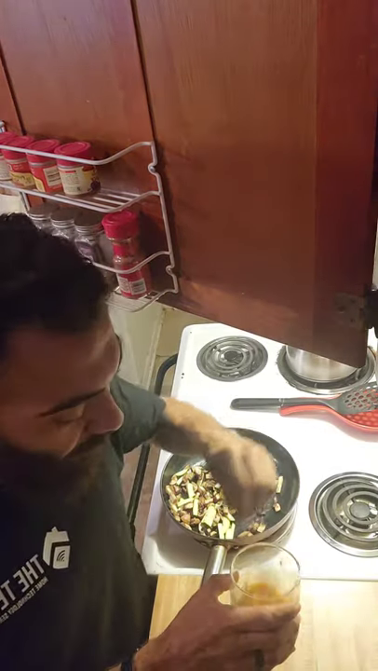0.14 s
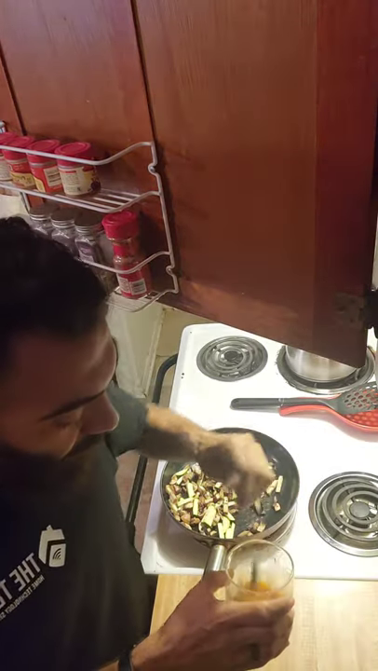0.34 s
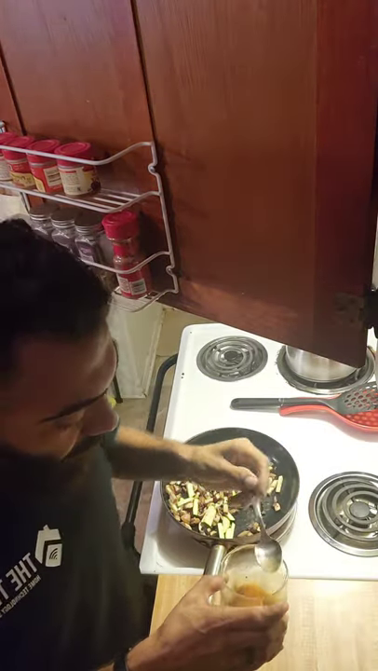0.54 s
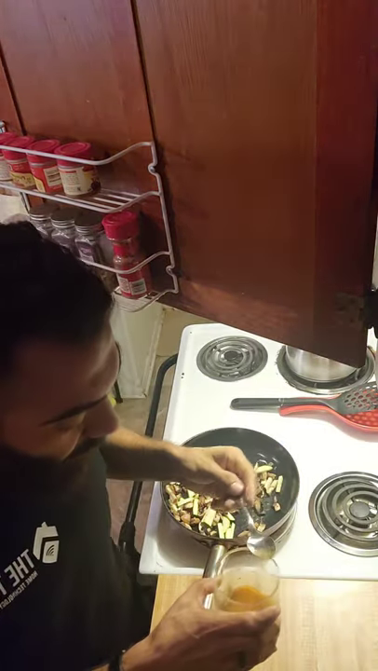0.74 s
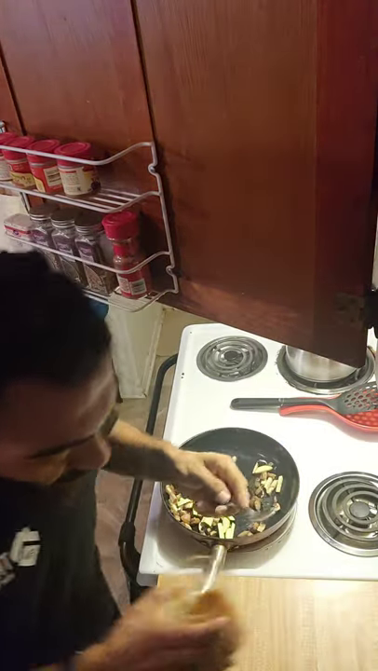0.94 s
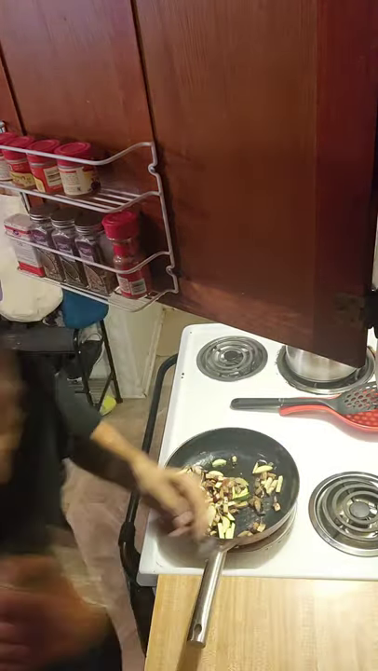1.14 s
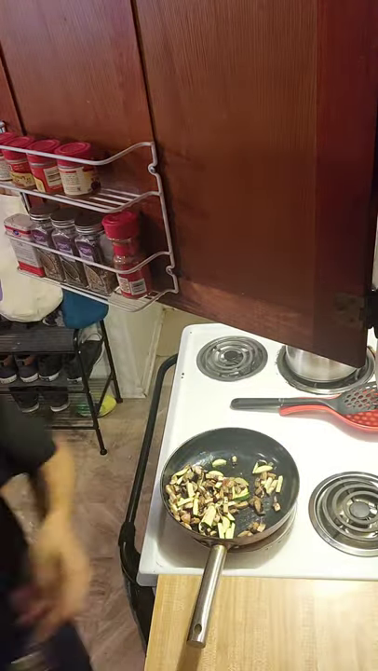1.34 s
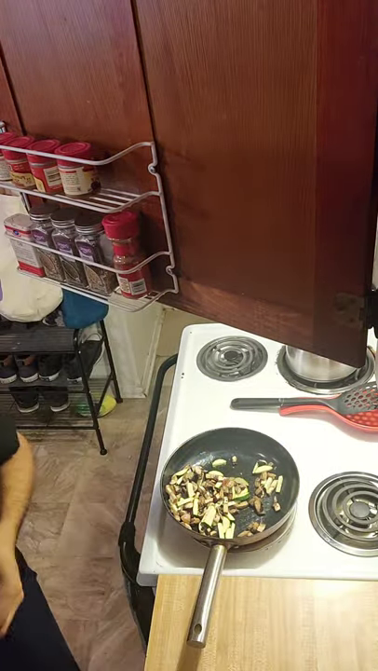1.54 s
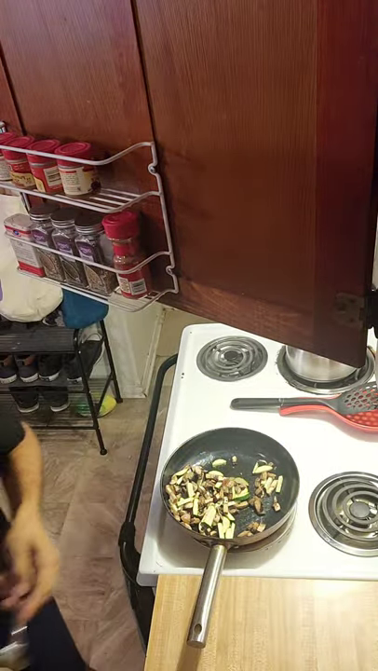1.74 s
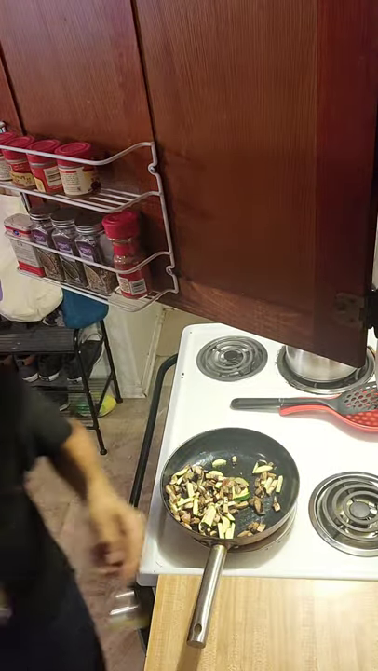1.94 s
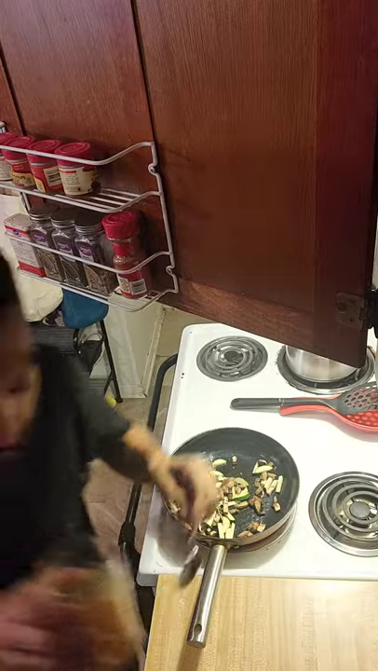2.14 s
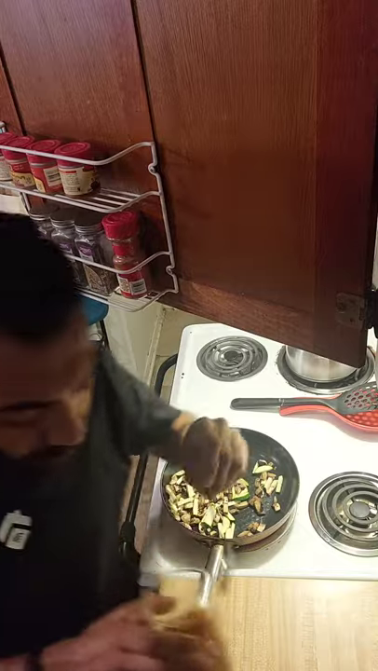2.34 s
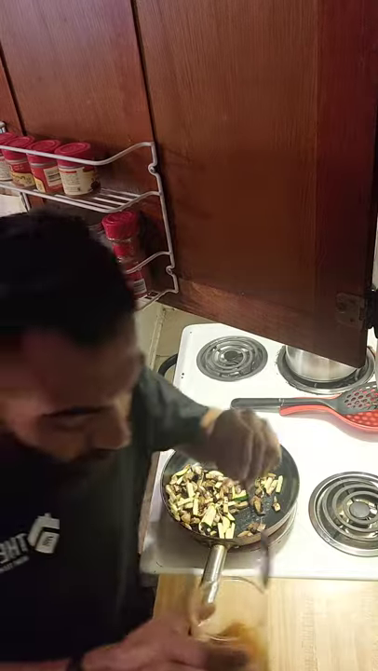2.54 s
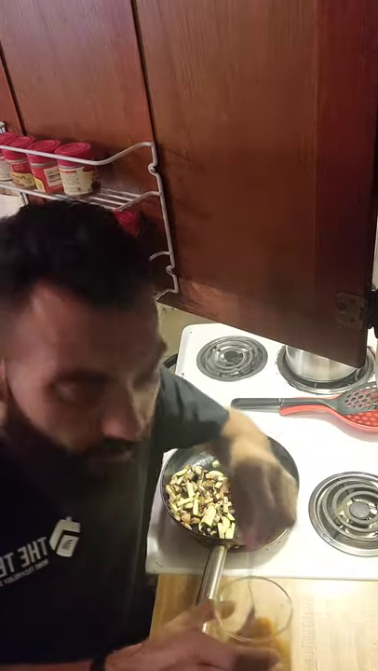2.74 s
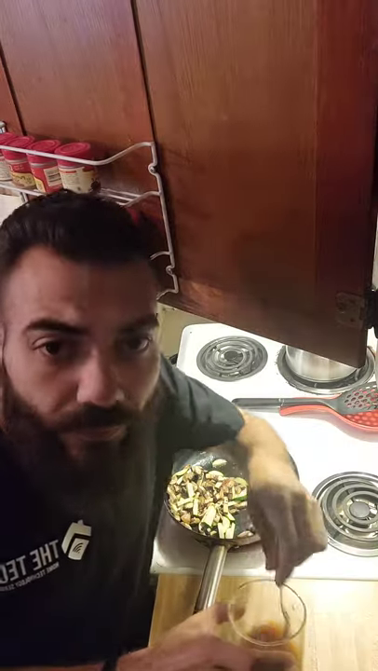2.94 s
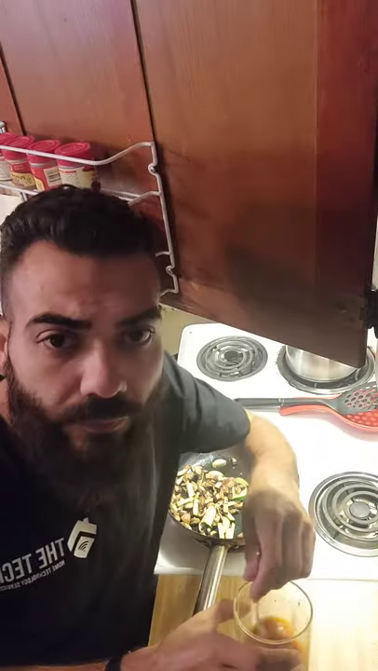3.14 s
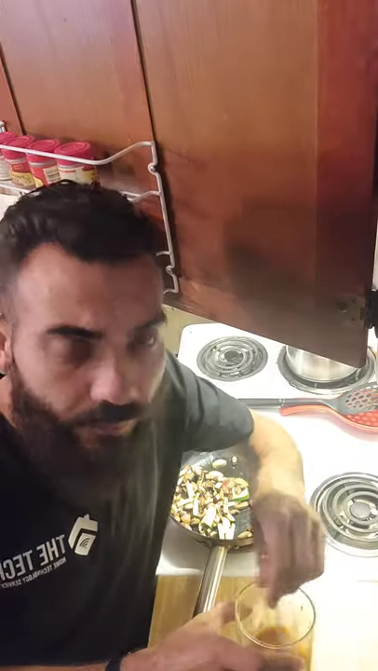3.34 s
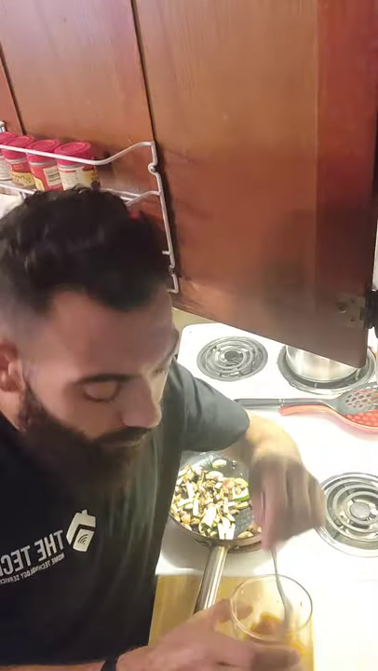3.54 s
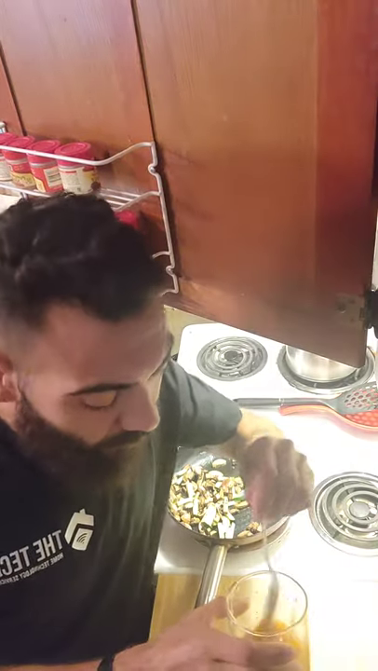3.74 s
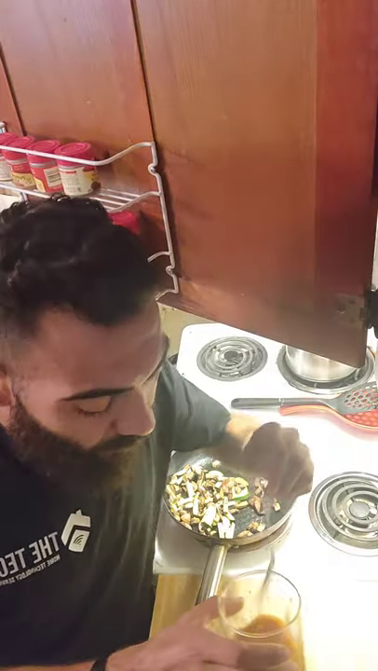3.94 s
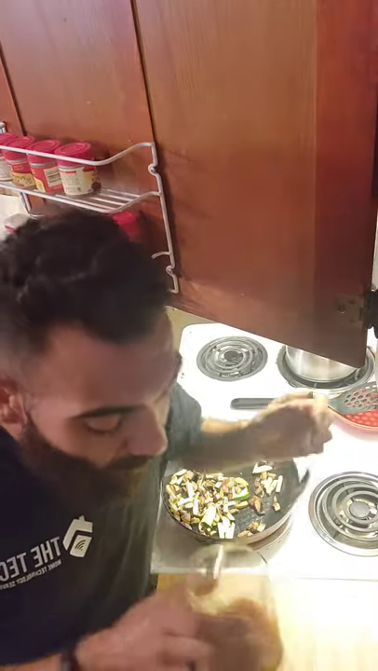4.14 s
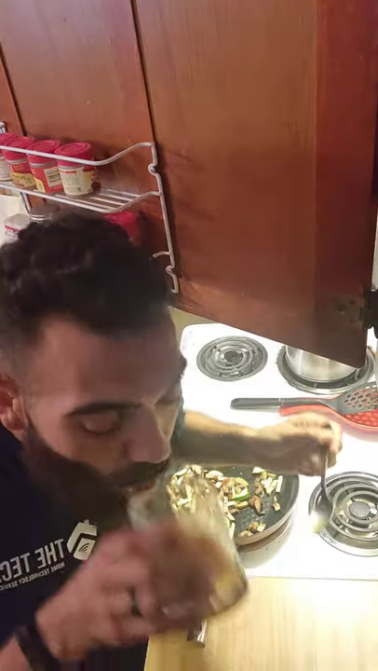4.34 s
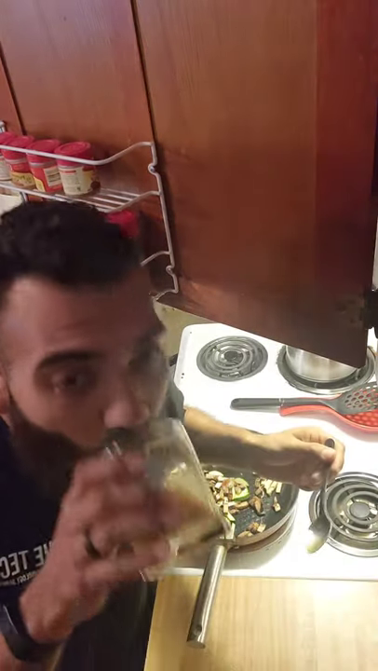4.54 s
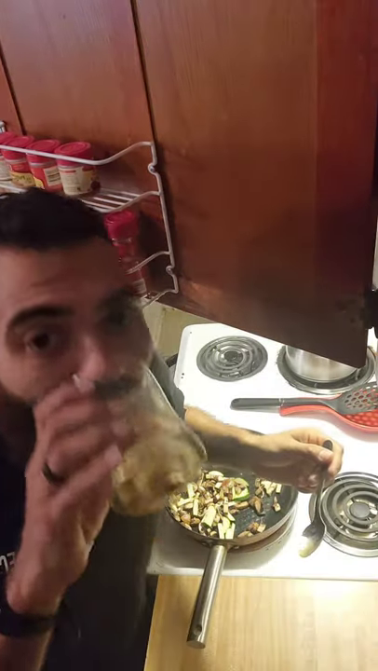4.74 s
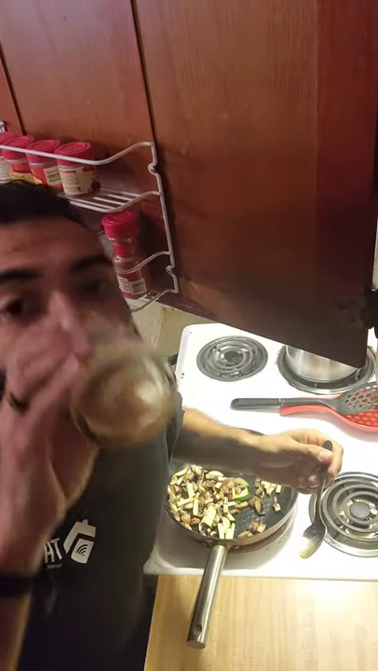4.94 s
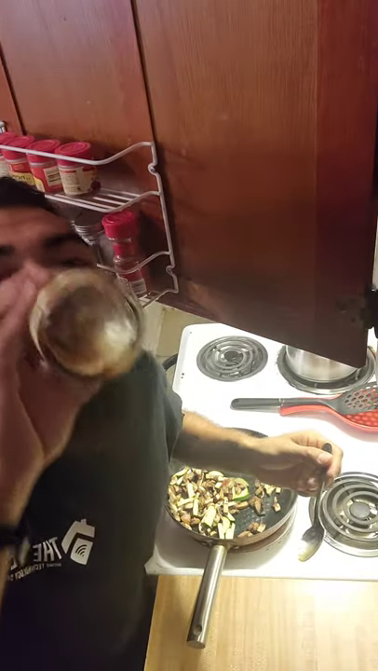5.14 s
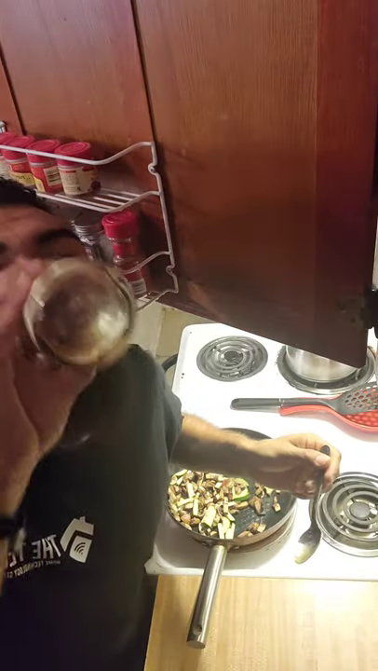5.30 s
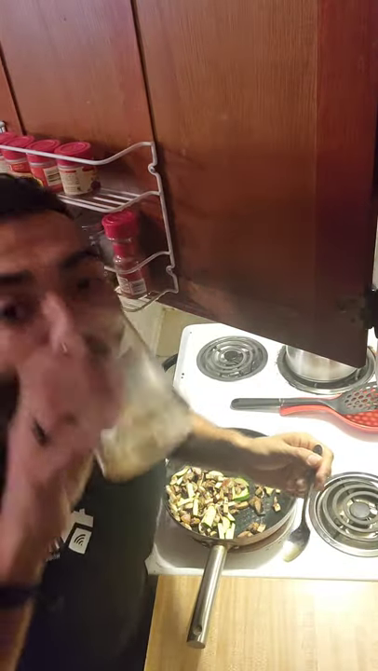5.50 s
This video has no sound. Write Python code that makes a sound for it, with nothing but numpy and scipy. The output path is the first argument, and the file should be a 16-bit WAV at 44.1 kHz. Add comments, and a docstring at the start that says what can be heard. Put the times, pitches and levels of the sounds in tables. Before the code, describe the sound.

Vegetables sizzle steadily in a frying pan while a metal spoon clinks in a hand-held glass, in bursts, over a low appliance rumble.

```python
"""Frying and stirring in a small kitchen

Stove to the right of a phone with two microphone ports: vegetables fry as dense noise clicks in flickering bands,
narrow noises make the pan hum, and larger oil bubbles spit as short damped tones.
A steel spoon taps and stirs in a hand-held glass: noise cracks with fading sines, echoed by the kitchen.
An appliance rumbles in the background: shaped noise, a swelling motor drone and a mains hum."""
import sys
import numpy as np
from scipy import signal
from scipy.fft import rfft, irfft, next_fast_len
from scipy.io import wavfile
from scipy.ndimage import uniform_filter1d

SR = 44100
rng = np.random.default_rng(int(sys.argv[2]) if len(sys.argv) > 2 else 0)


def store_pcm(level_fs):
    """Save levels as 16-bit WAV."""
    pcm = np.round(np.clip(level_fs, -1, 1) * 32767).astype(np.int16)
    wavfile.write(sys.argv[1], SR, np.atleast_2d(pcm).T)


N = 250047

# how hard the food fries, before the split between the ports: [t/s, level/dB]
FRY_LEVEL = [(0.0, -43), (0.33, -40), (0.75, -42.5), (1.36, -40), (2.3, -40), (2.46, -43), (2.75, -42.5),
             (3.13, -40.5), (3.45, -42), (3.9, -41.5), (4.55, -39), (5.2, -40.5), (5.67, -39.5)]
# colour of the frying ahead of the tilt, relative: [f/Hz, level per Hz/dB]
FRY_COLOUR = [(650, -55), (1100, -14), (1300, -14), (1510, -19.5), (1930, -8), (2460, -11.5), (4300, -4),
              (4770, -1.5), (5200, -4), (6000, 0), (7140, -12), (8360, -18), (9240, -16), (11300, -6.5),
              (12500, -8.5), (15800, -18)]
# three groups of pan modes, each mode relative to its group: [f/Hz, width/Hz, level/dB]
PAN_MODES = [
    [(717.7, 7.4, 6), (626.6, 12, -0.5), (770, 16, -8)],
    [(970, 10.5, 7.5), (1310, 140, 9)],
    [(539.5, 27.5, 5), (506, 10, -5)],
]
# drive of each group: [rms level at the start for usual frying/dB, gain per dB of frying/dB, growth/(dB/s)]
PAN_DRIVE = [(-74, 2.5, 1.5), (-72.5, 1.4, 0.5), (-66, 0.1, 0.22)]
# room tone, relative: [f/Hz, level per Hz/dB]
ROOM_TONE_COLOUR = [(12, -62), (20, -22), (42, -12), (65, -1), (123, -14), (142, -6.5), (250, -9),
                    (382, -9.5), (528, -11.5), (659, -11), (700, -3), (823, -8.5), (987, -17.5),
                    (1050, -17.5), (2500, -11), (3250, -35), (5500, -120)]
# likeness of the room tone at the two ports: [f/Hz, left-right correlation]
PORT_LIKENESS = [(60, 1), (130, 0.83), (290, 0.88), (640, 0.21), (1400, 0.79)]
# motor drone resonances, relative: [f/Hz, width/Hz, level/dB]
DRONE_MODES = [(60.4, 13, -2.5), (77.5, 13.5, 0)]
# rough level of the motor drone, which wavers by chance, ahead of its swell: [t/s, level/dB]
DRONE_ROUGH_LEVEL = [(0.0, -60.5), (2.5, -61.5), (3.4, -63.5), (3.7, -60.5), (4.7, -64), (5.67, -57.5)]
# spoon blows, and at 2.276 s a soft swell of noise and ringing just before the blow at 2.293 s;
# levels ahead of the onset, the left-right split and the high-pass: [t/s, noise level/dB, rise/s,
# fade length factor, left minus right/dB, slope of the ring/(dB/octave), then level/dB of the spoon's ring,
# its treble shimmer, and the belly, rim, wall and gripped base of the glass]
BLOWS_AND_SWELL = [(0.047, -11, 0.0025, 0.61, -5.5, 1, -25.5, -27.5, -27, -36, -51, -42),
                   (0.217, -9.5, 0.0038, 0.8, -4, 0.1, -22.5, -25, -22, -35.5, -62, -45),
                   (0.441, -15.5, 0.0025, 0.67, -6, 10.5, -29.5, -32.5, -22.5, -27.5, -35, -37.5),
                   (2.276, -9.5, 0.0174, 0.25, 0.7, 8, -28, -33, -27.5, -30, -40, -38),
                   (2.293, -14, 0.0023, 1.22, -1, 2, -21, -23, -19, -43, -28.5, -57),
                   (2.311, -16, 0.0014, 0.39, -2, 1, -25, -46, -29, -43, -37, -53),
                   (2.322, -19, 0.0014, 0.74, -3, 6, -29, -30, -35, -45, -49, -55),
                   (2.344, -20, 0.0048, 0.76, -4, 7, -32, -40, -47, -57, -56, -57),
                   (2.452, -38, 0.0019, 1.16, -5, 3, -49, -45, -38.5, -62, -62, -60),
                   (2.924, -12, 0.0014, 0.68, -6, 1, -25, -48, -30.5, -20, -30, -42),
                   (2.943, -11.5, 0.00082, 0.95, -2.5, -14, -22, -38, -36, -21.5, -39, -68),
                   (3.051, -21, 0.0017, 0.89, -10, 5, -44, -41, -47, -56, -43, -36),
                   (3.056, -14.5, 0.0018, 0.89, -4.5, 4, -40, -34, -33.5, -48, -44, -34),
                   (3.158, -11, 0.0017, 0.71, -4.5, 6, -46, -22.5, -33.5, -38, -22, -54),
                   (3.325, -41, 0.0012, 1.4, -7, -4.5, -59, -56, -65, -62, -59, -55),
                   (3.369, -35.5, 0.0011, 0.59, -4.5, 0.5, -39, -37, -32.5, -38, -36.5, -32.5),
                   (3.376, -32, 0.001, 0.41, -3, 2, -42, -57, -37, -55, -46, -39)]
# glass and spoon modes in groups that sound together: [f/Hz, ...] for each group
RING_HZ = [
    [860, 1000],
    [1195],
    [1885, 1920, 2022],
    [2230, 2279],
    [2357, 2760, 3560, 3960, 8780],
    [3010, 3070, 3240],
    [4130, 4380, 4650],
    [4870, 4918, 5040],
    [5540, 5755, 6020, 6290],
    [6780, 7335, 7650],
    [10800, 10995, 11150],
    [11850, 12400, 12850, 13750],
]
# the same modes, relative to their group: [level/dB, t60/s before the length factor]
RING_FADE = [
    [(0.15, 0.08), (-1.2, 0.072)],
    [(0, 0.58)],
    [(-3, 0.078), (-6, 0.16), (0.5, 0.079)],
    [(-0.5, 0.14), (1, 0.17)],
    [(-2.5, 0.11), (-4.5, 0.076), (-0.5, 0.062), (-4, 0.089), (-7, 0.12)],
    [(-6.5, 0.32), (-1.5, 0.17), (-5, 0.1)],
    [(0.5, 0.13), (3, 0.024), (-5, 0.08)],
    [(-6, 0.075), (7, 0.084), (3.5, 0.084)],
    [(7, 0.025), (0.66, 0.025), (4.5, 0.014), (2, 0.16)],
    [(-2.5, 0.019), (-9, 0.068), (-9.5, 0.2)],
    [(-0.5, 0.09), (-10, 0.06), (-2, 0.055)],
    [(-18, 0.035), (-16, .04), (7, 0.061), (-14, .04)],
]
# the part of spoon or glass that each group belongs to: [name]
RING_PART = ["base", "belly", "belly", "rim", "wall", "spoon", "base", "spoon", "shimmer", "shimmer",
             "shimmer", "wall"]
# each group against its part: [level/dB]
RING_GROUP_DB = [-1, -35, 0.5, -0.5, 0, 0, 2, -0.4, -2.5, -2, -1.5, -10]
# loud spits of oil, ahead of onset and decay: [t/s, level/dB, f/Hz]
SPITS = [(1.404, -24, 5800), (1.863, -20, 6000), (3.457, -34, 5530), (5.437, -14, 13200),
         (5.472, -20, 11200), (5.484, -30, 13500)]
# the far (left) port of the phone, shadowed from the stove: [f/Hz, level/dB, phase lag/rad]
FAR_PORT = [(300, 0.5, .1), (663, -3, 1.33), (1370, -1, 1.5), (2400, 1.5, 0.27), (3240, 1, 2),
            (4730, -1.5, 2.3), (5730, -4.5, 1.57), (7100, 0.5, 2.15), (11000, -3, 2.1), (13300, -7, 5.4),
            (16000, 0, 3.5)]

FRY_USUAL_DB, FRY_DIFFUSE_DB = -41, 5
FRY_TILT_DB_PER_OCTAVE, FRY_LEFT_MINUS_RIGHT_DB = 0.97, -4  # the split comes on top of the far port's shadow
ROOM_TONE_DB, MAINS_DB, MAINS_HZ = -59, -67.5, 119.5
DRONE_SWELL_DB, DRONE_SWELLS_PER_S = 1.2, 5.28
CRACK_TILT_DB_PER_OCTAVE, CRACK_T60_S = 0.4, 0.08  # t60 before the length factor
KITCHEN_T60_S, KITCHEN_DB = 0.2, -6
TOP_HZ = 15750


def undb(db):
    """Decibels to gain."""
    return 10 ** (np.asarray(db) / 20)


def level(x, db):
    """Scale to an rms level."""
    return x * undb(db) / np.sqrt(np.mean(x ** 2))


def over_hz(table, column, size):
    """A table column at every bin of a spectrum, joined on a log-frequency axis."""
    table = np.array(table, float)
    bins_hz = np.fft.rfftfreq(size, 1 / SR)
    return np.interp(np.log(bins_hz + 1), np.log(table[:, 0]), table[:, column])


def shape(x, gain):
    """Multiply the spectrum by a real or complex gain."""
    size = next_fast_len(N)
    return irfft(rfft(x, size) * gain(size), size)[..., :N]


def walk(rate):
    """Random levels held 1 / rate s and slewed twice; spread near 1."""
    hold = int(SR / rate)
    steps = np.repeat(rng.standard_normal(N // hold + 1), hold)
    return 1.3 * uniform_filter1d(uniform_filter1d(steps, hold), hold)[:N]


def add(out, s, x):
    """Mix a short sound in at time s."""
    i = int(s * SR)
    out[..., i:i + x.shape[-1]] += x[..., :N - i]


def narrow(hz, width):
    """Two unrelated noises ringing in one resonance."""
    sos = signal.butter(1, [hz - width / 2, hz + width / 2], "bandpass", fs=SR, output="sos")
    return level(signal.sosfilt(sos, rng.standard_normal((2, N))), 0)


def ports(near, far):
    """The stove side reaches the right port directly and the left one shadowed and late."""
    left = shape(far, lambda n: undb(over_hz(FAR_PORT, 1, n)) * np.exp(-1j * over_hz(FAR_PORT, 2, n)))
    return np.array([left, near])


def fry_db():
    """How hard the food fries, at every sample."""
    return np.interp(np.arange(N) / SR, *np.transpose(FRY_LEVEL))


def bursts(per_s, scatter_db):
    """Tiny bubbles burst at random: clicks whose sizes have a long tail."""
    hits = rng.random(N) < per_s / SR
    return hits * rng.standard_normal(N) * undb(scatter_db * rng.exponential(size=N))


def bubbling(per_s, sparse_db):
    """Steam bursts in the oil: a dense steady layer and a sparse one that wavers in level."""
    dense = level(bursts(per_s, 1.5), 0)
    sparse = level(bursts(700, 1.5), sparse_db)
    return dense + sparse * undb(1.5 * walk(15))


def frying():
    """Dense bursts, direct and scattered by the room, in bands that flicker; the cook's body changes what arrives."""
    shared = bubbling(9000, -9)
    # bubbles all over the pan and their reflections reach each port by its own path
    apart = np.array([bubbling(12000, -11) for _ in range(2)])
    both = shared + undb(FRY_DIFFUSE_DB) * apart
    both = shape(both, lambda n: undb(over_hz(FRY_COLOUR, 1, n)))
    out = 0
    surge_db = 0.5 * walk(24.53)  # common to all bands
    edges_hz = [900, 1800, 2800, 4200, 5400, 7000, 9500, 12500, 18000]
    for lo, hi in zip(edges_hz, edges_hz[1:]):
        band = shape(both, lambda n: np.abs(np.fft.rfftfreq(n, 1 / SR) - (lo + hi) / 2) <= (hi - lo) / 2)
        flicker_db = 0.5 * walk(14)
        tilt_db = FRY_TILT_DB_PER_OCTAVE * np.log2(hi / 7000)
        out = out + band * undb(surge_db + flicker_db + tilt_db)
    split_db = np.array([[FRY_LEFT_MINUS_RIGHT_DB], [-FRY_LEFT_MINUS_RIGHT_DB]]) / 2
    return level(ports(out[1], out[0]), 0) * undb(fry_db() + split_db)


def pan_hum():
    """Bursts keep the pan's low modes ringing: narrow noises whose levels follow the frying level."""
    out = 0
    for modes, (usual_db, follow, growth_db_per_s) in zip(PAN_MODES, PAN_DRIVE):
        follow_db = follow * (fry_db() - FRY_USUAL_DB)
        swell_db = usual_db + follow_db + growth_db_per_s * np.arange(N) / SR
        for hz, width, db in modes:
            common, own = narrow(hz, width)
            far = 0.57 * common + 0.3 * own
            out = out + np.array([far, common]) * undb(db + swell_db + 1.6 * walk(8.0))
    return ports(out[1], out[0])


def room_tone():
    """Broad background noise; mid and side signals set how alike the two ports are at each frequency."""
    colour = lambda n: undb(over_hz(ROOM_TONE_COLOUR, 1, n))
    like = lambda n: np.clip(over_hz(PORT_LIKENESS, 1, n), 0, 1)
    mid = shape(rng.standard_normal(N), lambda n: colour(n) * np.sqrt(1 + like(n)))
    side = shape(rng.standard_normal(N), lambda n: colour(n) * np.sqrt(1 - like(n)))
    return level(np.array([mid + side, mid - side]), ROOM_TONE_DB) * undb(0.5 * walk(3.3))


def motor_drone():
    """Low resonances in noise, nearly the same at both ports, that swell irregularly."""
    spread = np.array([[1, 0.12], [1, -0.089]])  # a little unrelated noise at each port
    drone = sum(spread @ narrow(hz, width) * undb(db) for hz, width, db in DRONE_MODES)
    rough_db = np.interp(np.arange(N) / SR, *np.transpose(DRONE_ROUGH_LEVEL))
    return drone * undb(rough_db + DRONE_SWELL_DB * walk(DRONE_SWELLS_PER_S))


def mains_hum():
    """A sine whose level wavers."""
    t = np.arange(N) / SR
    return np.sqrt(2) * undb(MAINS_DB + 1.5 * walk(46)) * np.sin(2 * np.pi * MAINS_HZ * t)


def appliance():
    """The background rumble: room tone, motor drone and mains hum together."""
    return room_tone() + motor_drone() + mains_hum()


def noise_crack(t, after, crack_db):
    """A coloured noise burst, the contact in a blow; separate at each port and stronger at the right."""
    octaves = np.log2((np.fft.rfftfreq(len(t), 1 / SR) + 1) / 5000)
    colour_db = 0.64 * over_hz(FRY_COLOUR, 1, len(t)) + CRACK_TILT_DB_PER_OCTAVE * octaves
    crack = irfft(rfft(rng.standard_normal((2, len(t)))) * undb(colour_db), len(t))
    fade = undb(crack_db - 60 * after / CRACK_T60_S)
    return crack / np.abs(crack).max() * fade * undb([[-1.5], [1.5]])


def ring_mode(t, after, hz, db, t60):
    """One fading mode of spoon or glass, which radiates differently to the two ports."""
    detune, lag, sway, start, aim = rng.standard_normal(size=5)
    # the hand and the drink shift each mode a little from one sound to the next
    shifted_hz = hz * (1 + 0.0011 * detune)
    left_lag = np.array([[hz / 1400 + 1.81 * lag], [0]])  # rad
    phase = 2 * np.pi * shifted_hz * t + 2 * start - left_lag
    # the spoon turns as it rebounds, so each mode sways away from the phone and back
    facing = 1 + 0.6 * np.cos(2 * np.pi * (40 + 12 * sway) * after + 0.76 * aim)
    shadow_db = np.array([[-1.2 * np.log2(hz / 4000)], [0]])  # the left port loses the treble
    return facing * undb(db + shadow_db - 60 * after / t60) * np.sin(phase)


def spoon():
    """Blows on the glass, each a short crack and a set of fading modes; one soft swell is made the same way."""
    out, t = np.zeros((2, N)), np.arange(int(.35 * SR)) / SR
    for s, crack_db, rise, length, split_db, slope_db, *parts_db in BLOWS_AND_SWELL:
        part_db = dict(zip(["spoon", "shimmer", "belly", "rim", "wall", "base"], parts_db))
        split = undb(np.array([[split_db], [-split_db]]) / 2)
        onset = split * np.clip(t / rise, 0, 1) ** 1.7
        after = np.maximum(t - rise, 0) / length  # fading time, scaled by the length factor
        sound = noise_crack(t, after, crack_db)
        for group_hz, fades, part, group_db in zip(RING_HZ, RING_FADE, RING_PART, RING_GROUP_DB):
            db = part_db[part] + group_db
            if part in ("spoon", "base"):
                # the spot of contact tips the ring to the low or the high modes
                db += slope_db * np.log2(group_hz[0] / 2750.0)
            for hz, (mode_db, t60) in zip(group_hz, fades):
                sound = sound + ring_mode(t, after, hz, db + mode_db, t60)
        add(out, s, onset * sound)
    # small things radiate no bass
    return signal.sosfilt(signal.butter(2, 620., "highpass", fs=SR, output="sos"), out)


def kitchen(x):
    """Reflections from cupboards and walls: a different decaying scatter at each port."""
    t = np.arange(int(.5 * SR)) / SR
    fade = undb(-60 * t / KITCHEN_T60_S) * np.clip(t / 0.0035, 0, 1)
    tail = rng.standard_normal((2, len(t))) * fade
    tail *= undb(KITCHEN_DB) / np.sqrt(np.sum(tail ** 2, axis=1, keepdims=True))
    return signal.fftconvolve(x, tail, axes=1)[:, :N]


def spits():
    """Single larger bubbles: a few damped cycles each."""
    out, t = np.zeros(N), np.arange(400) / SR
    for s, db, hz in SPITS:
        cycles = t * hz
        envelope = np.exp(-cycles / 4.2) * np.clip(cycles / 1.4, 0, 1)
        add(out, s, undb(db) * np.sin(2 * np.pi * cycles) * envelope)
    return ports(out, out)


def scene():
    """Everything in the kitchen; the sharp sounds also come back from the walls."""
    sharp = spoon() + spits()
    return sharp + kitchen(sharp) + frying() + pan_hum() + appliance()


def record(dry):
    """The phone rounds only the loudest peaks and cuts the top."""
    rounded = dry / (1 + (dry / .88) ** 6) ** (1 / 6)
    return signal.sosfilt(signal.ellip(16, .3, 100, TOP_HZ, fs=SR, output="sos"), rounded)


dry = scene()
out = record(dry)
store_pcm(out)
```